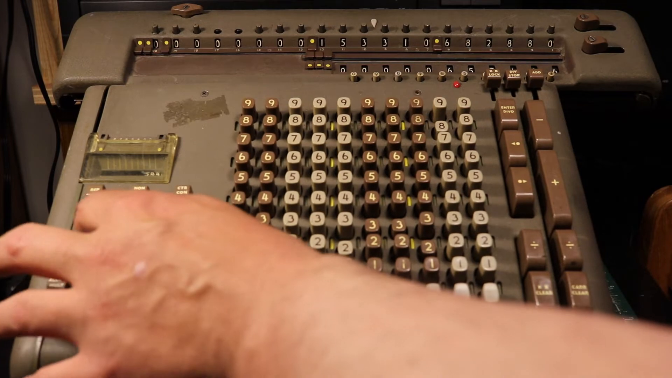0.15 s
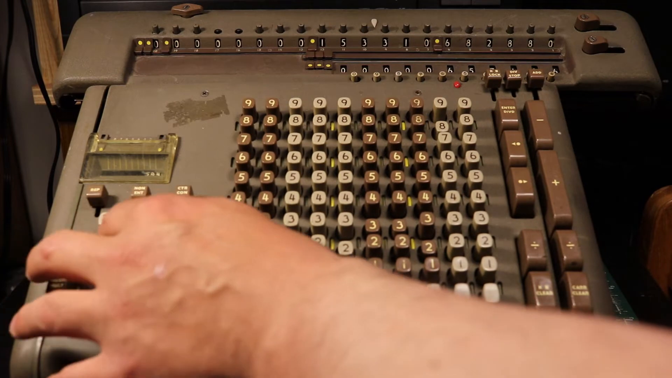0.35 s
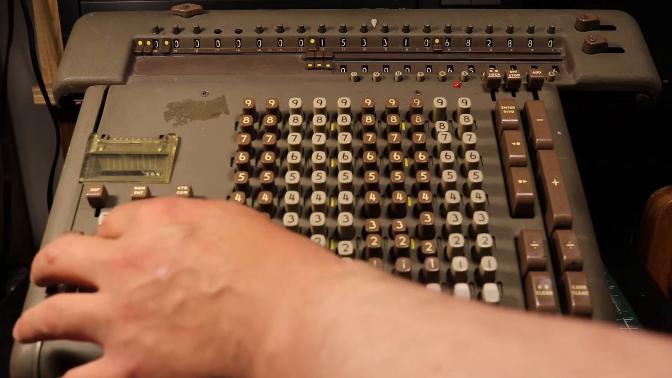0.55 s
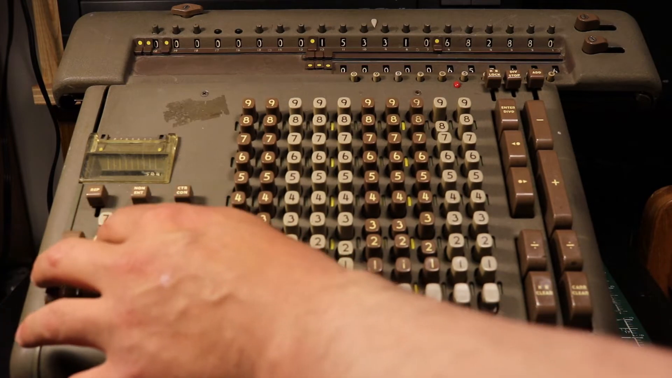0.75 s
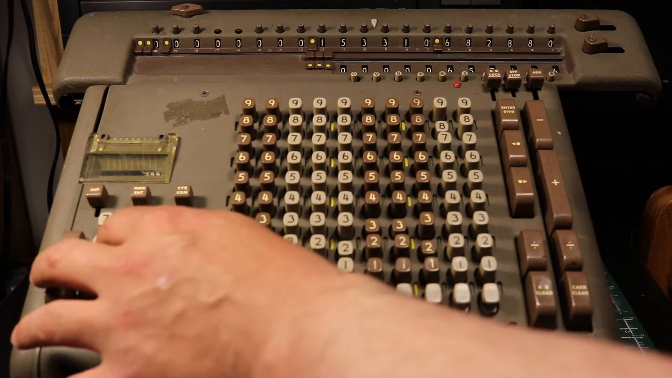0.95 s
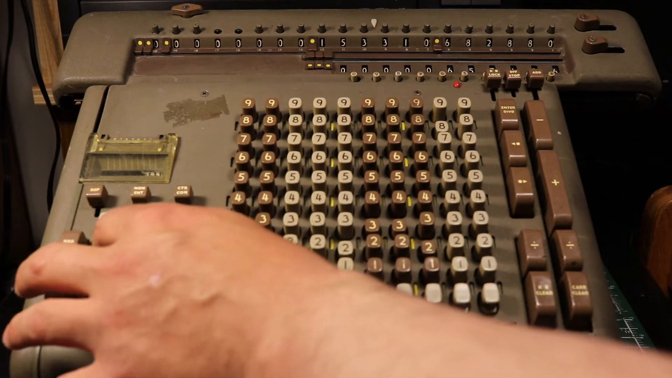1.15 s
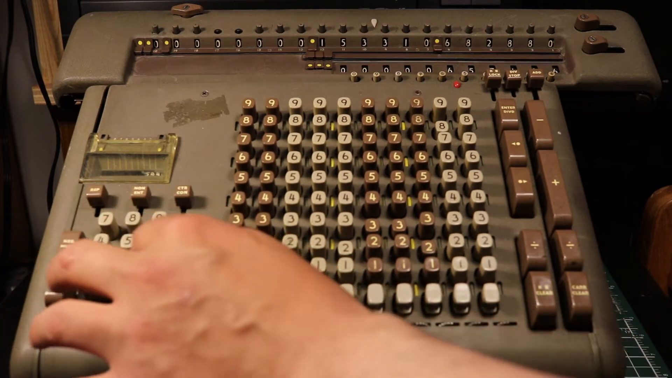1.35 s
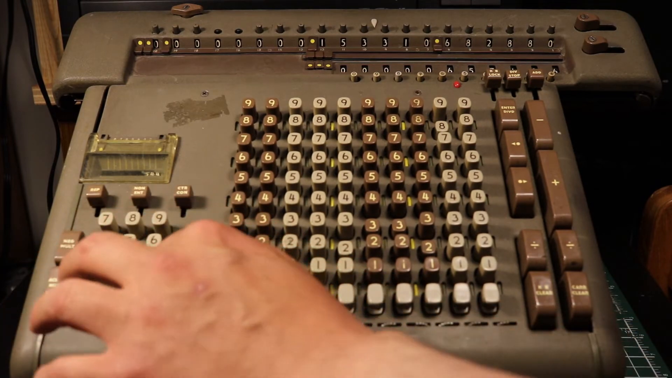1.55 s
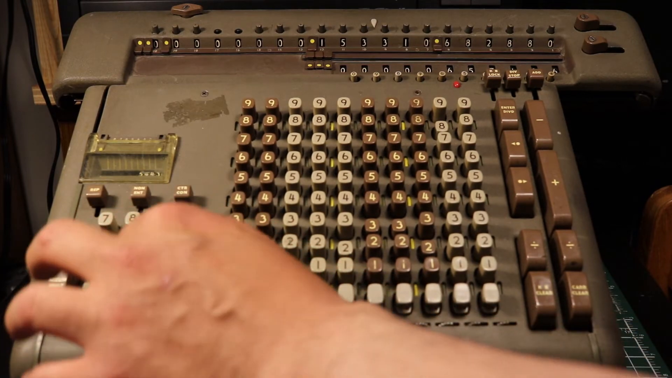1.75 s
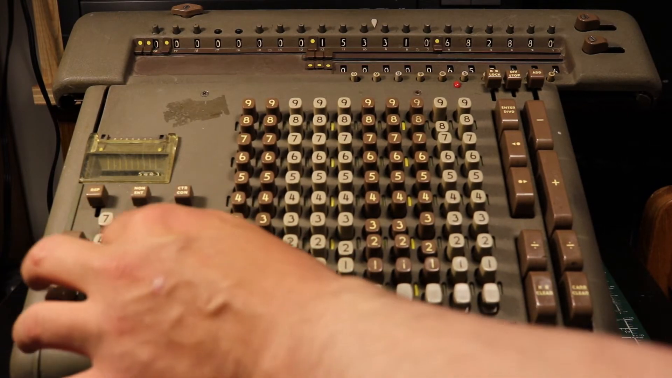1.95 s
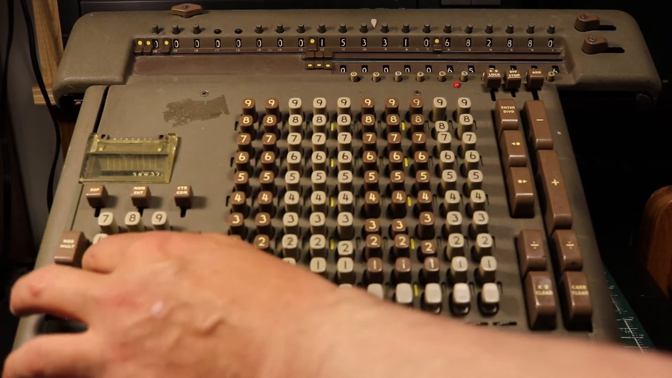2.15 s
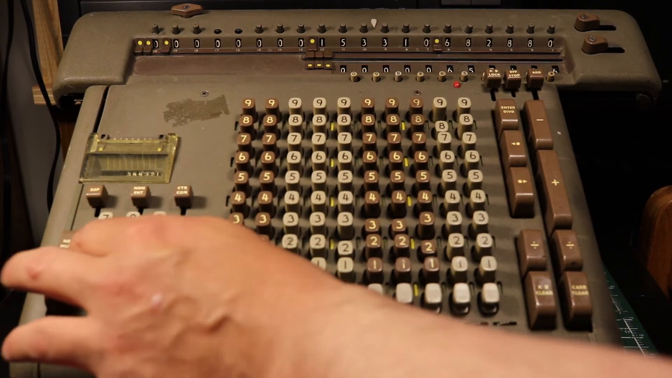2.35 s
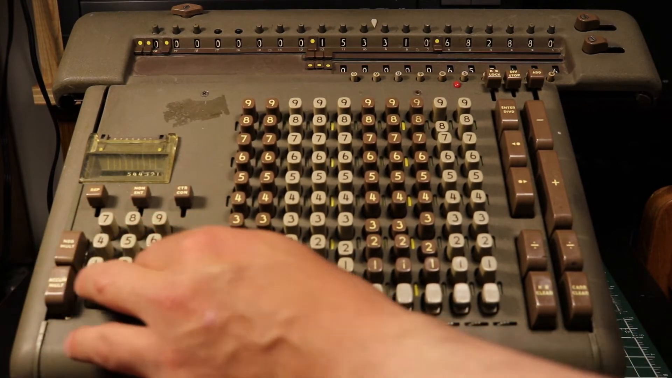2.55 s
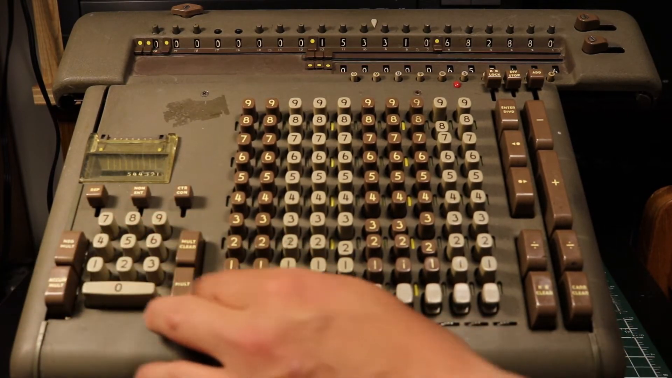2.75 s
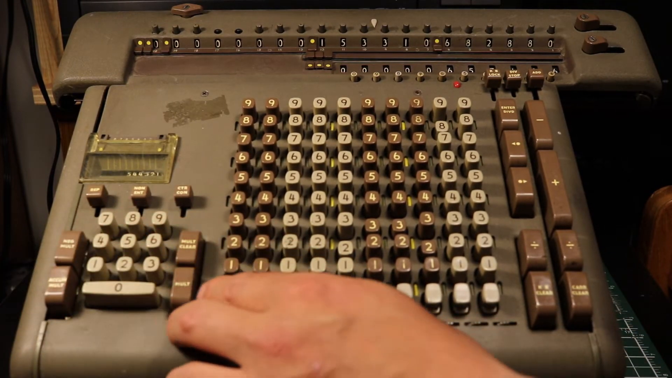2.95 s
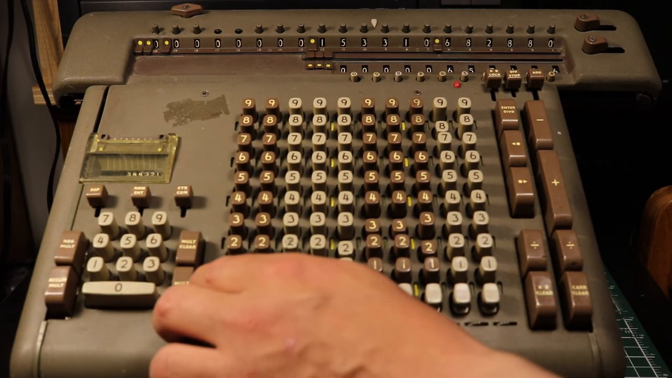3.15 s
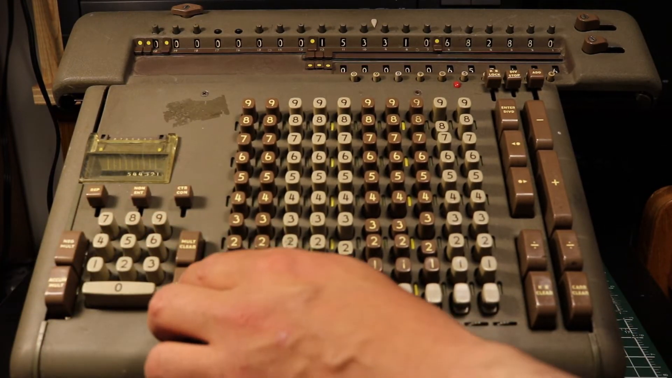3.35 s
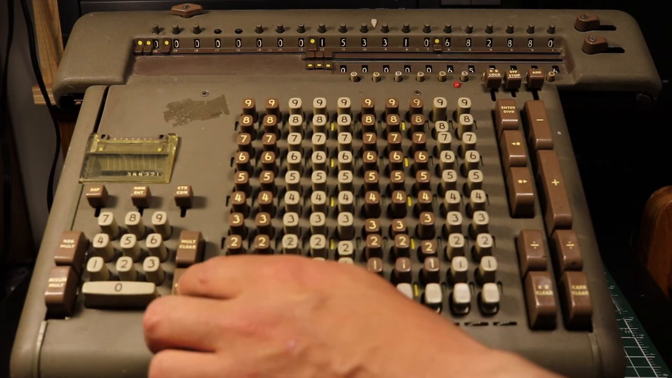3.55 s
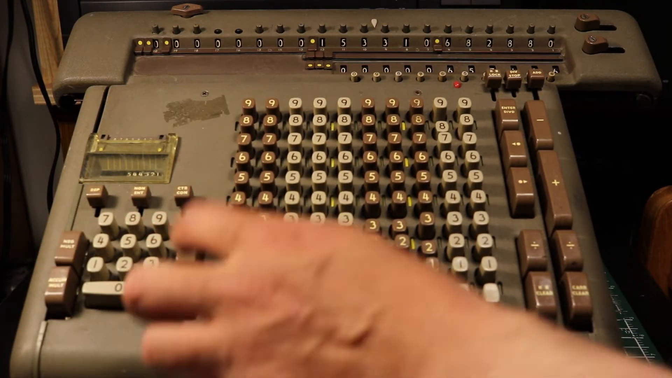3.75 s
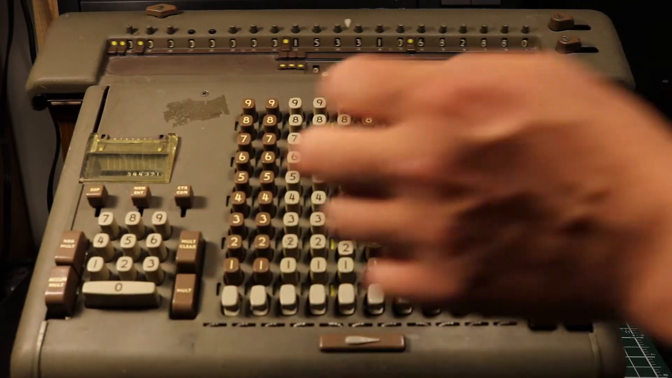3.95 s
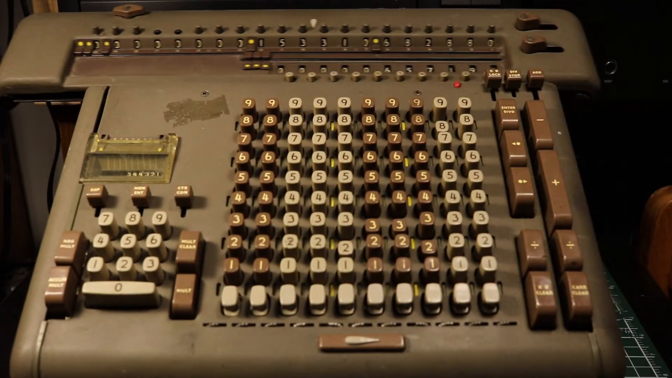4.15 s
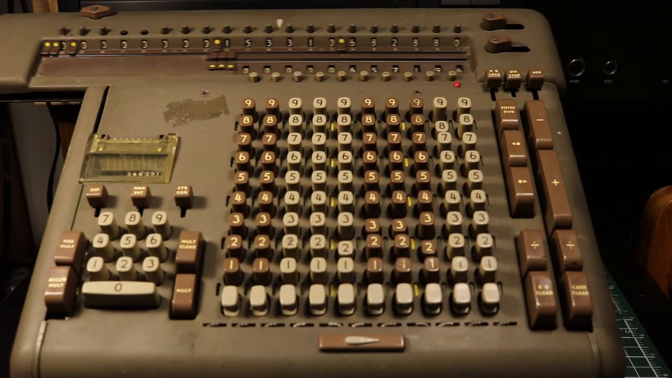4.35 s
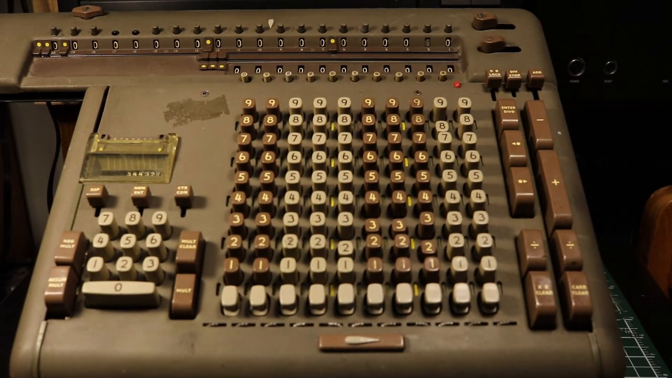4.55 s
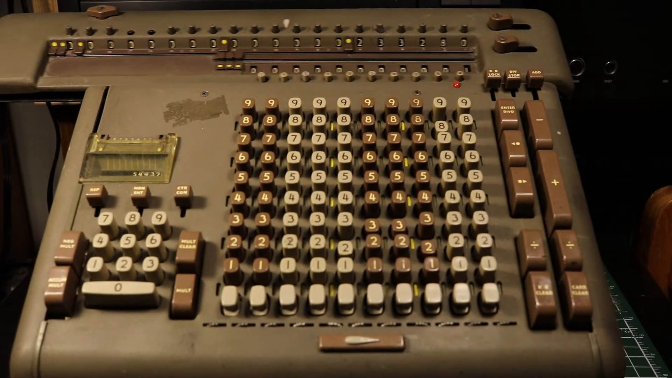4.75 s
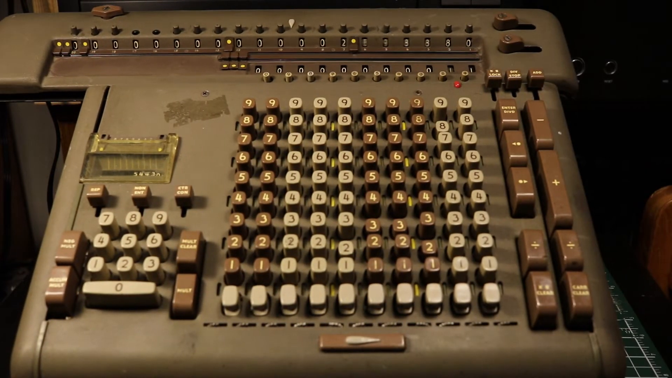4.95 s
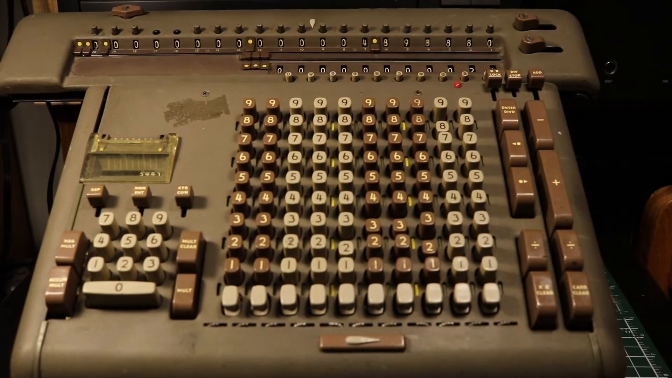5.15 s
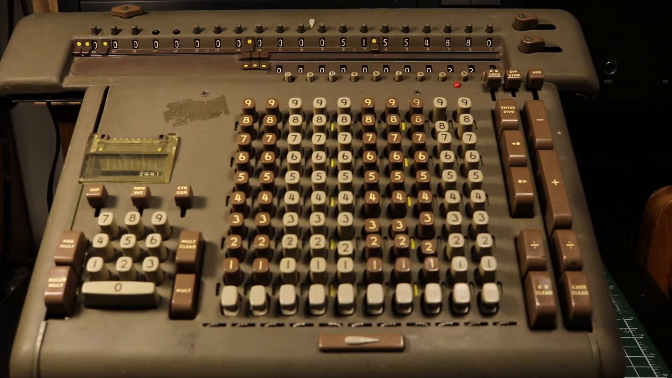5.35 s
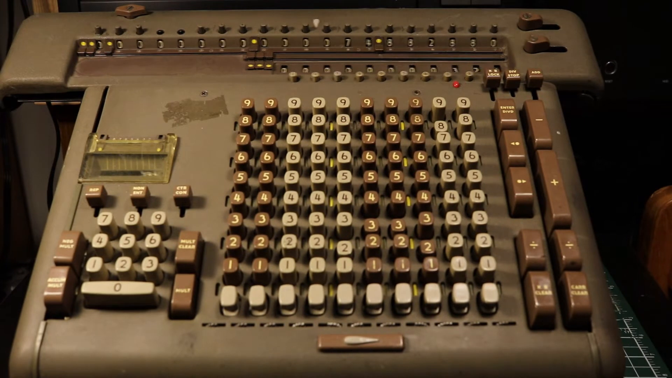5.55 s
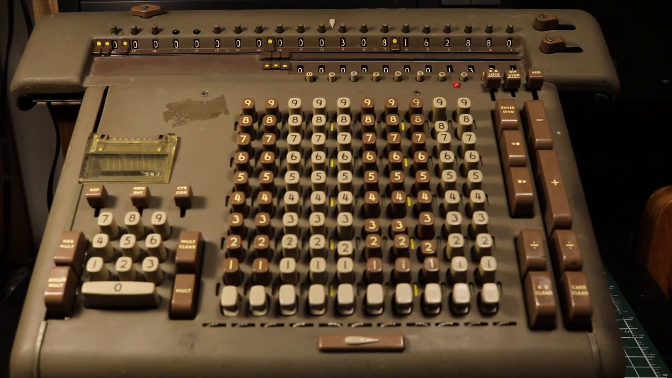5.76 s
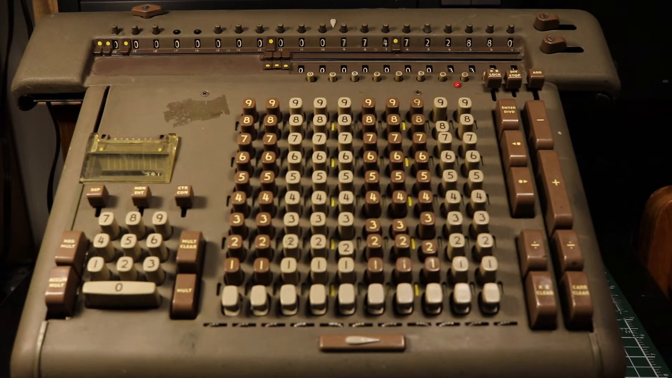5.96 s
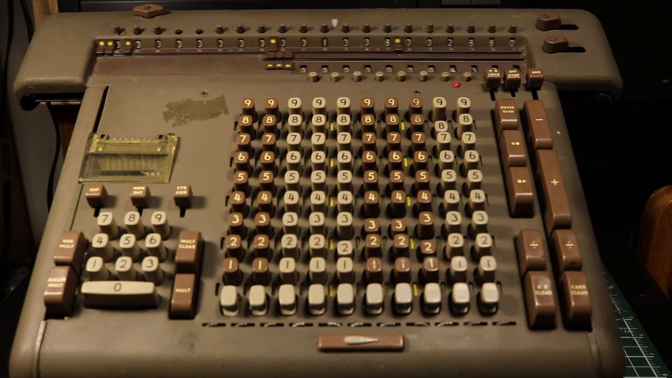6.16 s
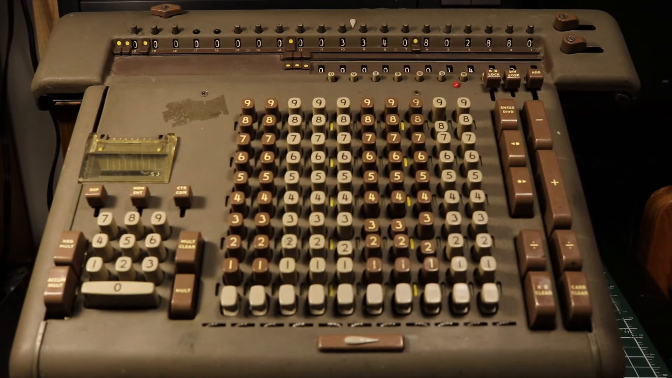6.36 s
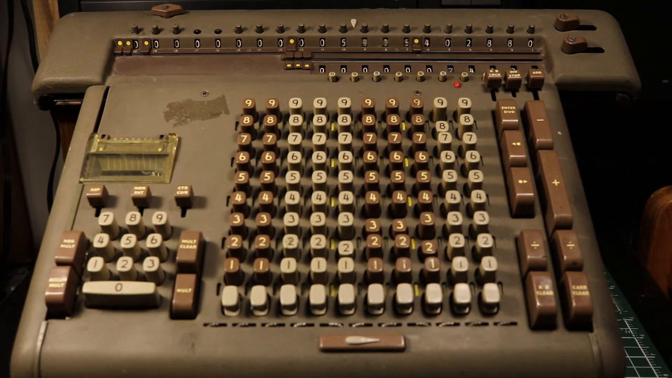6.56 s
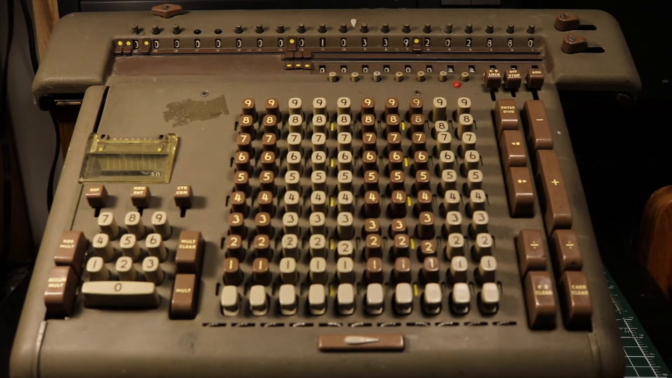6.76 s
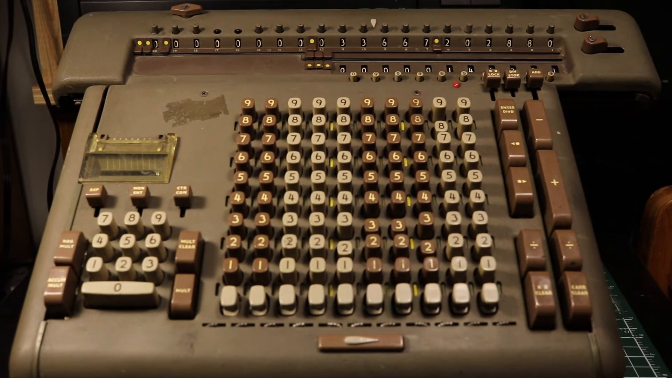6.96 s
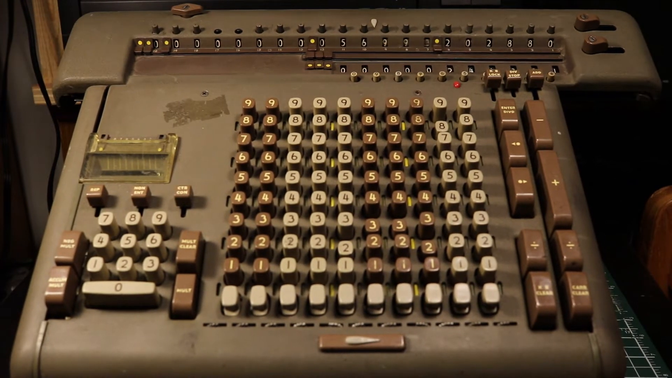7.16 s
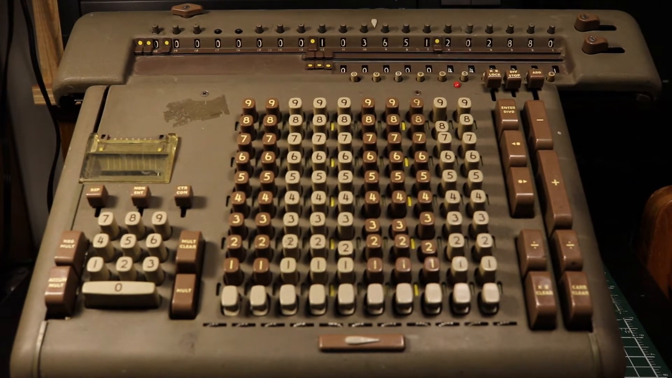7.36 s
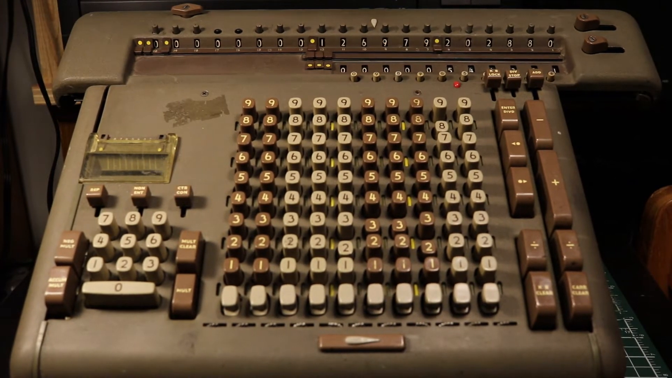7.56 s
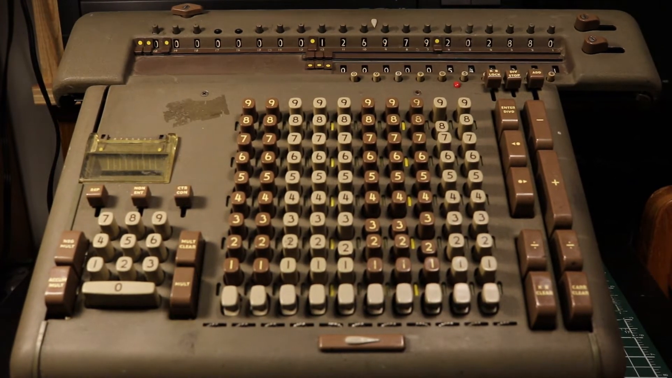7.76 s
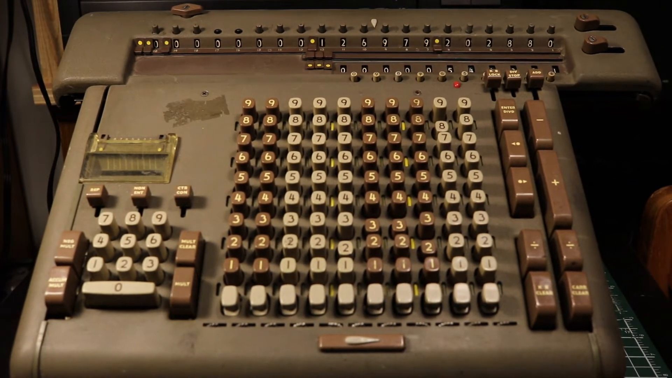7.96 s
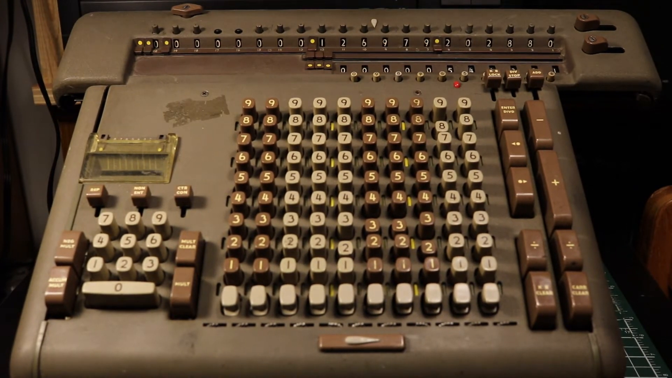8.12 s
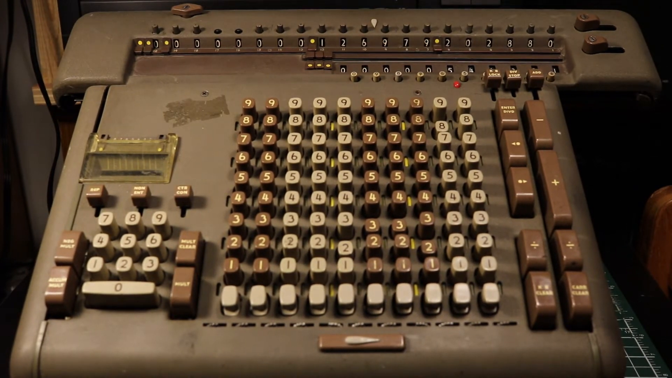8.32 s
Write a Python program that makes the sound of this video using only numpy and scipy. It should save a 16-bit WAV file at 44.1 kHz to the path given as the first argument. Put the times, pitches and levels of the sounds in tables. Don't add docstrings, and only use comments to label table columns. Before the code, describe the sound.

Close, dry mono sound of a motor-driven mechanical calculator in a quiet room, with soft hiss and faint low mains hum. At 0.07 s a key springs back with a clack and hollow thump; then only faint finger brushes. Key presses click at about 1.54, 1.87 and a sharper 2.17 s, their releases clacking and thumping at 1.68, 2.0 and 2.32 s. Quiet follows, with tiny touches. At about 3.6 s the motor starts: a gear whirr and fast rhythmic clatter, roughly eight turns per second. Around 4.45 s it grows heavier and denser, with bright metallic sweeps, springy snaps and hard carriage knocks near 4.5, 4.8, 5.0, 5.5, 6.1, 6.75 and 7.3 s. Heavy clunks from 7.5 s finish with the strongest at 7.7 s. The clatter breaks off by 7.8 s, leaving a faint ringing metal cover, dwindling whirr and irregular light ticks until about 8.3 s.

```python
import sys
import numpy as np
from scipy import signal
from scipy.fft import rfft, irfft
from scipy.io import wavfile
from scipy.ndimage import uniform_filter1d

SR = 44100
rng = np.random.default_rng(int(sys.argv[2]) if len(sys.argv) > 2 else 0)


def linear_from_db(decibels):
    return 10 ** (np.asarray(decibels, float) / 20)


def transcribe(u):
    v = np.clip(np.atleast_2d(u).T, -1, 1)
    q = np.round(v * 32767).astype(np.int16)
    wavfile.write(sys.argv[1], SR, q)


N = 369999

# (f/Hz, width/Hz, level/dB)
CASE_MODES = [(118.3, 43, -9), (162.4, 74, -2.5), (204, 38, 2.5), (265.2, 25.2, 0), (313.7, 18.5, 2),
              (354.6, 23.7, 0), (390.3, 13.2, 1.5), (440.4, 45.5, -4.5), (531.6, 47, -4), (625, 138, -9),
              (796, 69, -5.5), (912, 150, -12.5), (1055, 54, -4), (1157, 43, -4.5), (1285, 79, -8),
              (1455, 98, -16)]
LEVER_MODES = [(1594, 256, -1), (2152, 286, -1.5), (2565, 280, -4), (3066, 327, -0.5), (3416, 726, -1.5),
               (3896, 830, -2.5), (5210, 2800, -12.5)]
PAWL_MODES = [(5730, 700, -6), (6790, 1050, 0.5), (7425, 680, 5.5), (7890, 710, 4.5), (8820, 780, 4.5),
              (9700, 1510, -2.5)]
SPRING_MODES = [(11800, 3300, -5), (13500, 2000, 2), (15170, 3100, -3.5)]
# (lever/dB, spring/dB) against the pawl
THIN, TICK, CLACK, SNAP = (-21, -24), (-15, -15), (-8, -14.5), (-7, -20)
CAM, SWEEP, KNOCK, BOLT, COUNT = (-9, -16.5), (-4.5, -8.5), (2.4, -9), (-2, -15), (-13, -7)


def rms_one(x):
    return x / np.sqrt(np.mean(x ** 2) + 1e-20)


def in_time(rows):
    s, *columns = np.transpose(rows)
    return [np.interp(np.arange(N) / SR, s, c, left=-140, right=-140) for c in columns]


def drift(rate_hz):
    r = np.exp(-2 * np.pi * rate_hz / SR)
    walk = signal.lfilter([1], [1, -2 * r, r * r], rng.standard_normal(N + SR))
    return rms_one(walk[SR:])


def part(force, modes):
    out, pulse = 0, 0
    for k, (hz, width_hz, level_db) in enumerate(modes):
        r = np.exp(-np.pi * width_hz / SR)
        b = linear_from_db(level_db) * (-1) ** k * (1 - r * r) * np.array([1, 0, -1])
        a = [1, -2 * r * np.cos(2 * np.pi * hz / SR), r * r]
        out = out + signal.lfilter(b, a, force + 1e-18)
        pulse = pulse + signal.lfilter(b, a, signal.unit_impulse(SR))
    return out / np.sqrt(np.sum(pulse ** 2))


def machine(force, case=CASE_MODES, lever=LEVER_MODES):
    return sum(part(f, modes) for f, modes in zip(force, (case, lever, PAWL_MODES, SPRING_MODES)))


def grains(per_s, spread_db):
    strength_db = spread_db * np.minimum(rng.exponential(1, N), 5)
    sizes = linear_from_db(strength_db) * (rng.random(N) < per_s / SR)
    return rms_one(sizes) * rng.choice([-1, 1], (4, N))


def spread(rows):
    return [(s, pawl_db, ms, case_db, pawl_db + kind[0], pawl_db + kind[1])
            for s, ms, pawl_db, case_db, kind in rows]


def contacts(rows, rise, shape, shares):
    force = np.zeros((4, N))
    ms = np.arange(SR // 8) * 1000 / SR
    for s, pawl_db, length_ms, case_db, lever_db, spring_db in rows:
        i = round(s * SR)
        age = ms / (max(length_ms, .3) * np.array(shares)[:, None])
        rattle = (1 - np.exp(-age / rise)) * np.exp(-age ** shape)
        force[:, i:i + len(ms)] += linear_from_db([[case_db], [lever_db], [pawl_db], [spring_db]]) * rattle
    return force


def afterbuzz(force, t60_s):
    kept = linear_from_db(-120 / (np.array(t60_s) * SR))
    power = [signal.lfilter([1 - k], [1, -k], f ** 2) for f, k in zip(force, kept)]
    return np.sqrt(power) * rng.standard_normal((4, N))


def train():
    blow = contacts(train_rows(), rise=.22, shape=2.4, shares=[.9, 1.1, 1.3, 1.7])
    blow = blow * linear_from_db([[-2.0], [-3.0], [-8.0], [-3.5]])
    buzz = afterbuzz(blow, t60_s=[0.25, 0.35, 0.29, .08])
    force = blow * grains(9000, spread_db=3.5) + linear_from_db([[-9.0], [-11.0], [-11.0], [-14.0]]) * buzz
    return machine(force)


def train_rows():
    # (t/s, rattle/ms, pawl/dB, case/dB, kind)
    clutch = [(3.6233, 6.7, -43, -55, KNOCK), (3.6454, 17, -19.5, -46, CAM), (3.6552, 18, -37, -25.5, BOLT),
              (3.7091, 39, -34, -28.5, BOLT), (3.7316, 13, -26, -19, CAM), (3.7675, 6.6, -34, -29, CAM),
              (4.438, 36, -28, -27, BOLT), (4.4664, 50, -26, -26, SWEEP), (4.5017, 22, -20.5, -24, SWEEP),
              (4.5452, 21.4, -13.5, -15.5, (-3.5, -9)), (7.4925, 5.7, -16.5, -35, BOLT),
              (7.5972, 18, -20, -15, BOLT), (7.6143, 9.3, -31.5, -19, (11.3, 3.4)),
              (7.6776, 33, -25, -37, BOLT), (7.701, 41, -21.5, -18.5, (-3.5, -10)),
              (7.7458, 19.7, -22.5, -14, BOLT), (7.7903, 5.8, -28, -22, BOLT)]
    # (detent on the case/dB, sweep on the pawl/dB, sweep on the case/dB)
    turns = [(-30, -26.5, -25), (-38, -24.5, -21), (-20, -24, -20), (-33, -25.5, -24.5), (-41, -27, -43),
             (-31, -26, -26.5), (-27, -23, -42), (-24, -29, -23), (-30, -22, -27), (-20, -29, -25),
             (-22, -37, -39), (-34, -17.5, -19.5), (-26, -19.5, -25), (-34, -23, -23), (-21, -27, -27),
             (-40, -18, -19), (-36, -19.5, -16.5), (-23.5, -24, -36), (-16, -17.5, -16.5), (-17, -30, -21),
             (-36, -21, -31), (-37, -22.5, -29), (-19, -19, -16.5), (-17, -21.5, -18), (-19.5, -22.5, -15),
             (-19, -21, -30), (-21, -24, -43), (-13.5, -19, -16.5), (-24, -21, -18), (-18, -31, -39)]
    shift_turns = [9, 12, 16, 21, 26]
    run_turns = [1, 2, 2, 3, 3]
    trip_times = [.049, 0.0498, 0.0468, .050, 0.051]
    # (trip on the case/dB, latch on the pawl/dB, first counter tick t/s, slip later each turn/s)
    shifts = [
        (-13.5, -17, .070, 0.0404),
        (-12, -16, .079, 0.0106),
        (-12.5, -30, .079, 0.011),
        (-12.5, -16.5, .070, 0.0102),
        (-14.5, -26, .077, 0.0085),
    ]
    shaft_s, turn_s = 3.625, .1232
    idle_turns = 6
    rebound_db = -3.5

    rows = list(clutch)
    for k, (detent_db, pawl_db, case_db) in enumerate(turns, 1):
        s = shaft_s + k * turn_s
        idle = k < idle_turns
        kind = CAM if idle else SWEEP
        rows += [(s + 0.0372, 5.9, -22, detent_db, CAM),
                 (s + 0.1088, 13, pawl_db, case_db, kind),
                 (s + 0.1247, 13.4, pawl_db + rebound_db, case_db + rebound_db, kind)]
        if idle:
            rows.append((s + 0.0722, 7.2, -26.5, -22, SWEEP))
        else:
            rows.append((s + 0.063, 2.5, -45, -38, (-5, 13)))
    for k, run, trip_s, (trip_db, latch_db, tick_s, slip_s) in zip(shift_turns, run_turns, trip_times, shifts):
        s = shaft_s + k * turn_s
        rows += [(s - turn_s + trip_s, 9.6, -23, trip_db, KNOCK),
                 (s + 0.0054, 3.1, latch_db, -31, CAM),
                 (s + 0.0349, 19, -23, -18, BOLT),
                 (s + 0.0714, 12, -24.5, -18.5, BOLT)]
        rows += [(s + tick_s + j * (turn_s + slip_s), 7.6, -21.5, -32, COUNT) for j in range(run + 1)]
    return spread(rows)


def stops():
    # (t/s, peak level/dB)
    blows = [(4.032, -15), (4.502, -8), (4.664, -16), (4.773, -7.5), (5.034, -14), (5.526, -14),
             (6.14, -15), (6.756, -11), (7.299, -18), (7.493, -16), (7.702, -3)]
    rows = [(s, peak_db - 13.0, 3.0, peak_db - 9.0, peak_db - 14, peak_db - 18) for s, peak_db in blows]
    force = contacts(rows, rise=.1, shape=1, shares=[1, 1, 1, 1]) * grains(12000, spread_db=3)
    return machine(force)


def whirr():
    # (t/s, level/dB)
    load_curve = [(3.6, -70), (3.65, -35.5), (3.75, -30.5), (4.42, -30), (4.55, -28.5), (6.0, -28.5),
                  (7.77, -28.5), (7.84, -43.5), (8.0, -53), (8.15, -57), (8.39, -73.5)]
    # (t/s, peak level/dB)
    coast = [(7.8877, -41), (7.9441, -58), (7.964, -51), (8.0045, -43), (8.0355, -38), (8.063, -52),
             (8.0783, -41), (8.1152, -51), (8.1377, -50), (8.1641, -59), (8.2504, -59), (8.2803, -55)]
    case_db, = in_time(load_curve)
    lever_db = case_db - 8
    full_load_db, steepness = -27, 1.94
    pawl_db = np.maximum(-36 + steepness * (case_db - full_load_db), case_db - 18)
    ticks = np.zeros(N)
    for s, peak_db in coast:
        ticks[round(s * SR):][:600] += linear_from_db(peak_db - 11) * np.exp(-np.arange(600) / 180.0)
    clicks = ratchet()
    load = [linear_from_db(case_db),
            linear_from_db(lever_db) + ticks,
            linear_from_db(pawl_db) + linear_from_db(-14) * ticks + clicks,
            linear_from_db(pawl_db - 6.5) + linear_from_db(-2.0) * clicks]
    return machine(load * grains(7000, spread_db=2.5) * linear_from_db(1.64 * drift(44)))


def ratchet():
    start_s, gap_s, drag_s = 7.875, 0.037, .0013
    level_db, fade_db = -65, 7
    force = np.zeros(N)
    for k in range(8):
        i = round((start_s + gap_s * k + drag_s * k * k) * SR)
        force[i:i + 400] += linear_from_db(level_db - fade_db * k) * np.exp(-np.arange(400) / 140.0)
    return force


def keys():
    # (f/Hz, width/Hz, level/dB)
    key_case = [(115, 34, -8), (152, 40, -3.5), (218.3, 30, -1.5), (295, 26, 0), (359, 51, -6),
                (524, 160, -14), (770, 61, -8), (1144, 400, -17)]
    # (f/Hz, width/Hz, level/dB)
    key_lever = [(1300, 1100, -16), (2204, 300, -6.5), (2890, 360, -1.5), (3340, 280, 0), (4070, 910, -8)]
    blow = contacts(key_rows(), rise=0.018, shape=0.74, shares=[1.62, 0.9, 0.65, 0.71])
    blow = blow * linear_from_db([[4.0], [1.5], [-7.0], [1.5]])
    force = blow * grains(12000, spread_db=-1.0) + linear_from_db(15.0) * np.gradient(blow, axis=1)
    force[0] = linear_from_db(10.5) * np.gradient(uniform_filter1d(blow[0], size=31, origin=15))
    buzz = afterbuzz(blow, t60_s=[0.19, 0.26, 0.23, 0.144])
    force += linear_from_db([[-17.0], [-11.0], [-11.0], [-12.0]]) * buzz
    return machine(force, key_case, key_lever)


def key_rows():
    # (t/s, rattle/ms, pawl/dB, case/dB, kind)
    presses = [
        (1.5399, 3, -19.5, -29, (-14, -23)),
        (1.8706, 4.3, -18.5, -24.5, (-13, -18)),
        (2.173, 1.5, -11.5, -26.5, SNAP),
    ]
    # (t/s, rattle/ms, latch/dB, thump later/s, finger lift/dB)
    returns = [
        (0.0737, 5.2, -16, .0128, -43),
        (1.6763, 3.5, -9.5, 0.022, -64.5),
        (1.996, 4.1, -11, .0168, -42.5),
        (2.3242, 3.5, -17, .0125, -49),
    ]
    # (t/s, rattle/ms, pawl/dB, case/dB, kind)
    catches = [
        (0.0701, 3.2, -24, -30, CLACK),
        (1.6655, 4.4, -34, -42, THIN),
        (1.669, 2.1, -21, -33, (-26, -16)),
        (1.9924, 2.0, -29, -29, CLACK),
        (2.3194, 6.6, -38.5, -42.5, (3.6, -1)),
    ]
    # (t/s, rattle/ms, pawl/dB, case/dB, kind)
    settle = [(.0014, 8.2, -42.5, -41, CLACK), (0.012, 2.7, -40, -31, TICK), (.0366, 10, -49, -41, CLACK),
              (1.51, 4.7, -51, -50, TICK), (1.5914, 3.7, -39, -36, CLACK), (1.788, 5.9, -32.5, -38, TICK),
              (1.833, 5.8, -47, -49, CLACK), (1.8614, 3, -42, -61, TICK), (1.9126, 3.9, -43, -50, CLACK),
              (2.084, 5.5, -27, -32, TICK), (2.0974, 3.3, -45, -58, THIN), (2.1107, 4.3, -41, -48, TICK),
              (2.282, 3, -35, -45, THIN), (2.359, 1.6, -35, -32, CLACK)]
    # (t/s, rattle/ms, pawl/dB, case/dB, kind)
    brushes = [(0.2907, 3.7, -50, -48, TICK), (0.4504, 3, -56, -60, CLACK), (1.2224, 3, -49, -69, COUNT),
               (1.3485, 2.5, -40, -48, THIN), (1.4203, 1.8, -51, -50, TICK), (2.587, 3, -62, -51, CLACK),
               (2.6528, 2.9, -51, -65, THIN), (2.857, 1.3, -47, -55, TICK), (3.027, 7.2, -41.5, -47, TICK),
               (3.2864, 4.2, -44, -53, TICK), (3.401, 3, -50, -55, THIN), (3.5913, 3, -51, -44, TICK)]
    bottoms = [(s + .014, 5, -45, -33, TICK) for s, *_ in presses]
    rows = presses + catches + settle + brushes + bottoms
    for s, ms, latch_db, after_s, lift_db in returns:
        rows += [(s - .017, 5.5, lift_db, lift_db + 10, CLACK),
                 (s, ms, latch_db, -32, (-12.5, -20)),
                 (s + after_s, 4.7, -27, -13, (-5.5, -15))]
    return spread(rows)


def pings():
    # (t/s, f/Hz, level/dB, t60/s)
    tones = [(.2897, 3250, -59, .02), (.4489, 3830, -62, .02), (2.1728, 2860, -8, 0.013),
             (2.1724, 2600, -41, .2), (2.1724, 3100, -41, .15), (2.586, 2700, -59, .02),
             (2.6516, 9000, -51, 0.018), (2.857, 1900, -48, 0.017), (2.857, 8700, -49, .02),
             (3.027, 750, -55, .04), (3.2849, 5900, -59, .06), (3.617, 3500, -49, .04),
             (7.78, 346, -50, 2.6)]
    rise_s = .0007
    s, hz, level_db, t60 = np.transpose(tones)[:, :, None]
    age = np.maximum(np.arange(N) / SR - s, 0)
    envelope = linear_from_db(level_db - 60 * age / t60) * (1 - np.exp(-age / rise_s))
    return np.sum(envelope * np.sin(2 * np.pi * hz * age), axis=0)


def cover():
    # (f/Hz, width/Hz, level/dB)
    sheet = [(161, 3, 0), (269, 2.2, -6)]
    clutch_s, jolt_db, decay_s = 7.75, -31, 0.0068
    age = np.arange(N) / SR - clutch_s
    jolt = linear_from_db(jolt_db) * (age > 0) * np.exp(-np.abs(age) / decay_s)
    return part(jolt * rng.standard_normal(N), sheet)


def rubs():
    # (t/s, level/dB)
    slides = np.array([(1.412, -57.5), (1.51, -58), (1.82, -51), (2.11, -52.5), (2.30, -47.5),
                       (3.03, -65.5), (3.588, -57)])
    age = np.arange(N) / SR - slides[:, :1]
    push = linear_from_db(slides[:, 1:]) * (age > 0) * np.exp(-np.abs(age) / 0.031)
    return part(push.sum(axis=0) * rng.standard_normal(N), [(797, 77, 0)])


def desk():
    # (t/s, level/dB)
    rumble = [
        (3.6, -72),
        (3.7, -67),
        (4.4, -49),
        (5.1, -49.5),
        (5.6, -50),
        (7.75, -55),
        (7.95, -57),
    ]
    shake = part(rng.standard_normal(N), [(28, 3.1, 3.0), (62, 62, -11.5), (86.0, 12, -3)])
    return shake * linear_from_db(in_time(rumble)[0] + 3.3 * drift(4.4))


def shaped(points):
    hz = np.fft.rfftfreq(N, 1 / SR) + 1
    points = np.array(points)
    gain_db = np.interp(np.log(hz), np.log(points[:, 0]), points[:, 1])
    spectrum = rfft(rng.standard_normal(N)) * linear_from_db(gain_db)
    return irfft(spectrum, N) / np.std(irfft(spectrum * (hz > 100), N))


def room_floor():
    # (f/Hz, level per Hz/dB)
    air = [(15, 13), (45, 5), (90, -2), (130, 3), (300, -2.5), (1000, -11), (4000, -18.5), (16000, -25)]
    # (f/Hz, rms level/dB)
    mains = [(59.9, -58)]
    t = np.arange(N) / SR
    hum = sum(np.sqrt(2) * linear_from_db(level_db) * np.sin(2 * np.pi * hz * t) for hz, level_db in mains)
    return linear_from_db(-65.5) * shaped(air) + hum


def scene():
    machinery = train() + stops() + whirr() + cover()
    small_sounds = keys() + pings() + rubs()
    return (machinery + small_sounds + desk() + room_floor())[None]


def top_cut(x):
    return signal.sosfilt(signal.butter(12, 16820, fs=SR, output="sos"), x)


def record(dry):
    top_hz = 15850
    low_pass = signal.ellip(8, .5, 32, top_hz, fs=SR, output="sos")
    return top_cut(signal.sosfilt(low_pass, dry))


dry = scene()
out = record(dry)
transcribe(out)
```